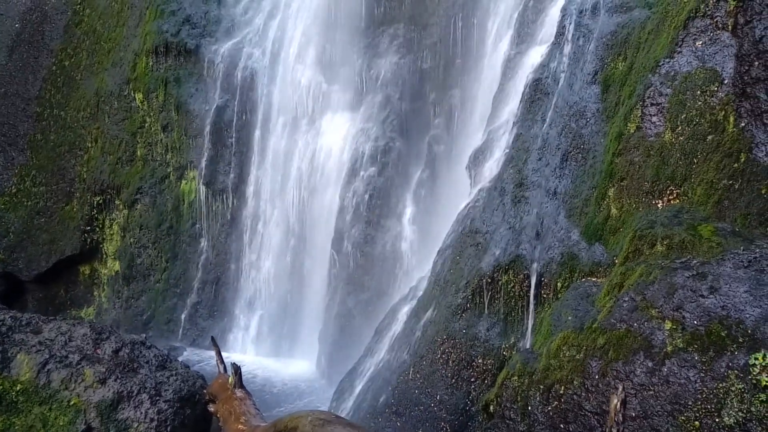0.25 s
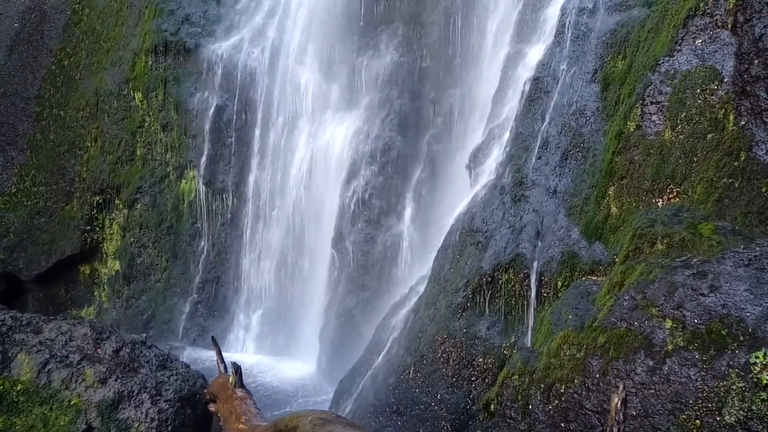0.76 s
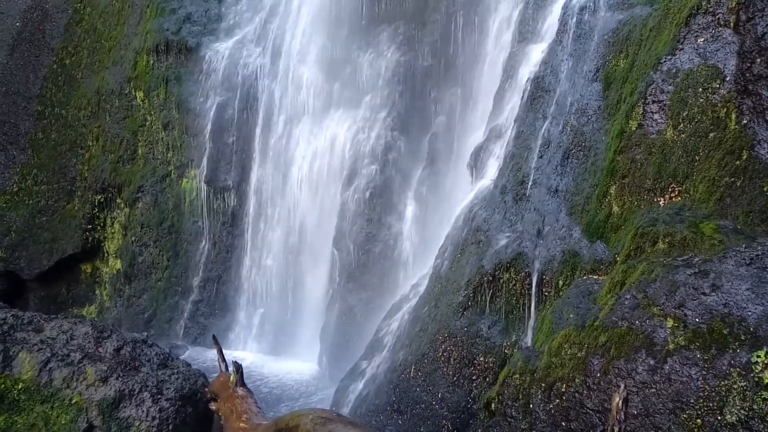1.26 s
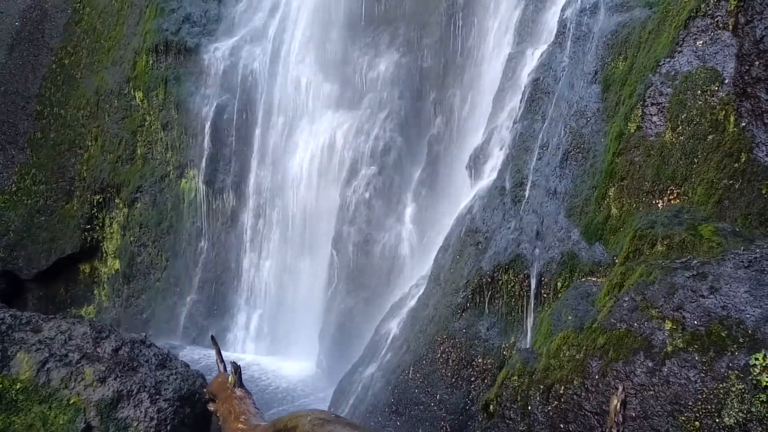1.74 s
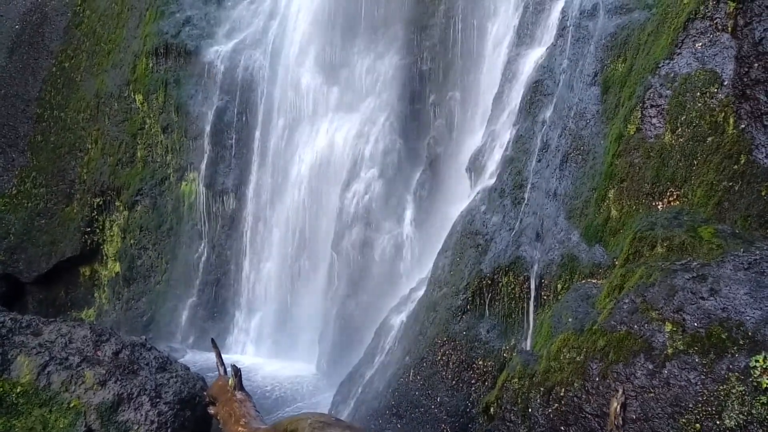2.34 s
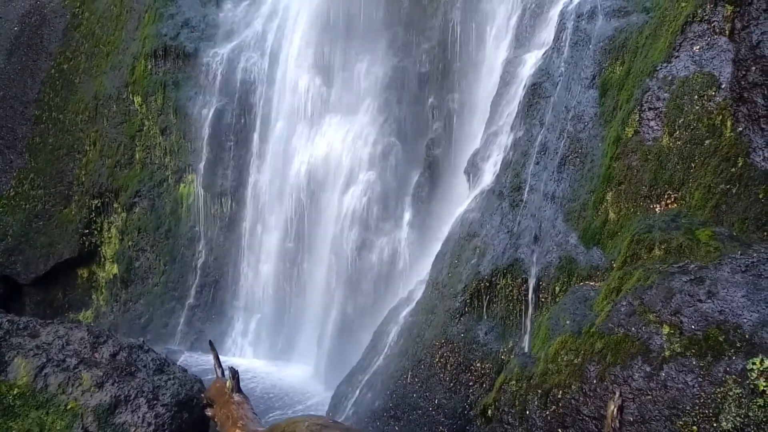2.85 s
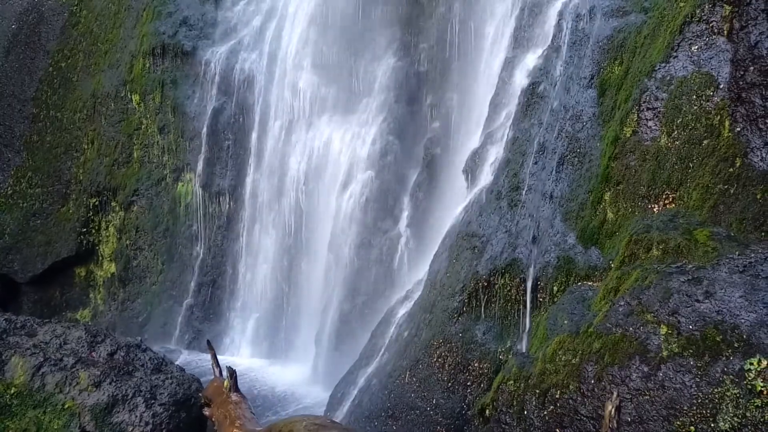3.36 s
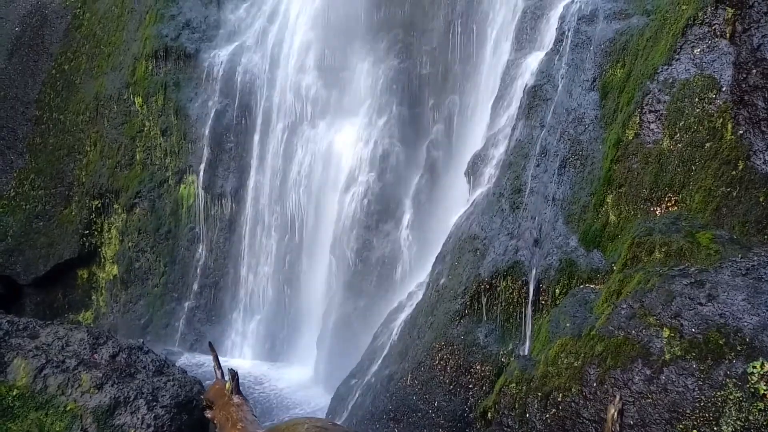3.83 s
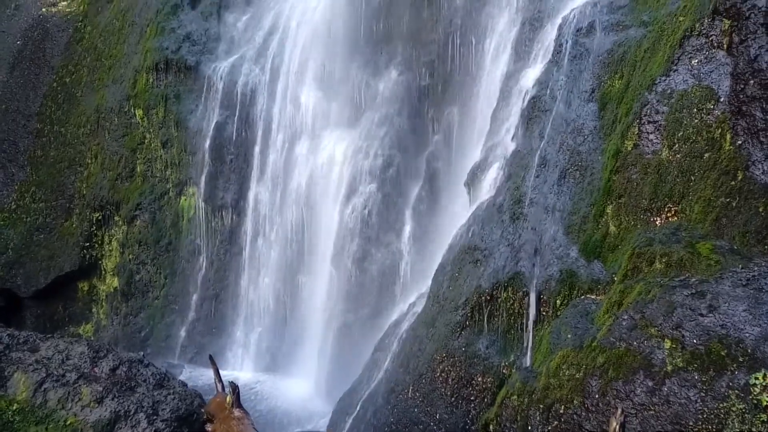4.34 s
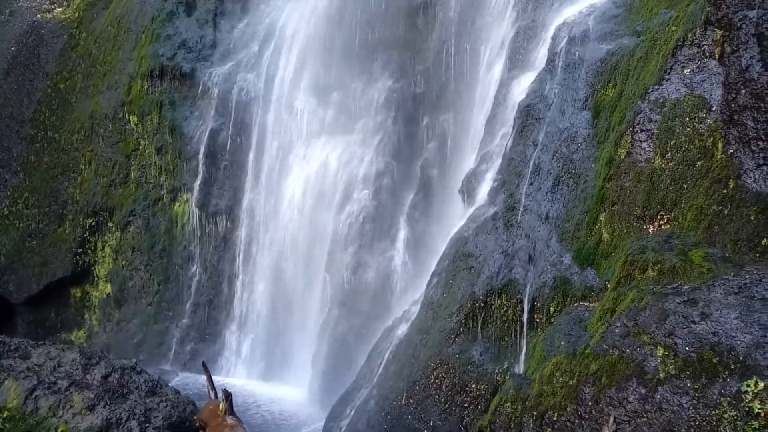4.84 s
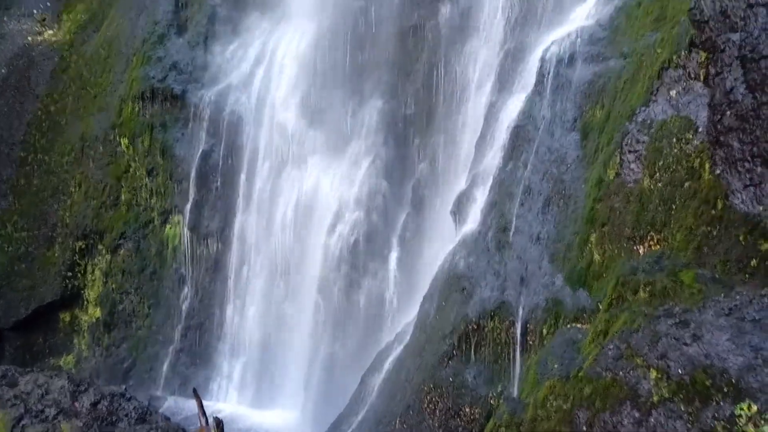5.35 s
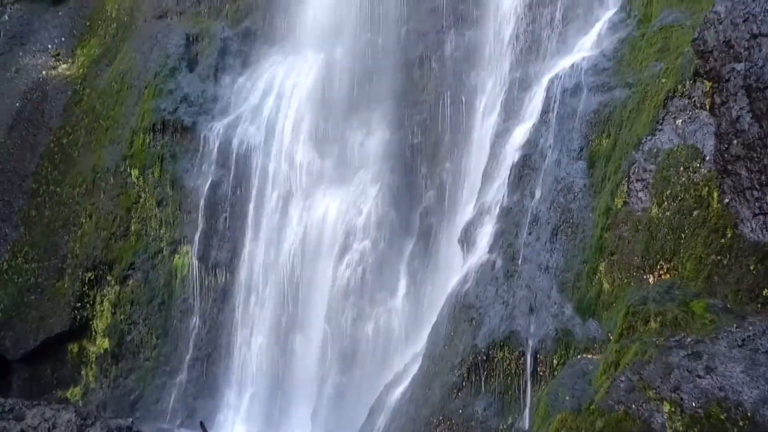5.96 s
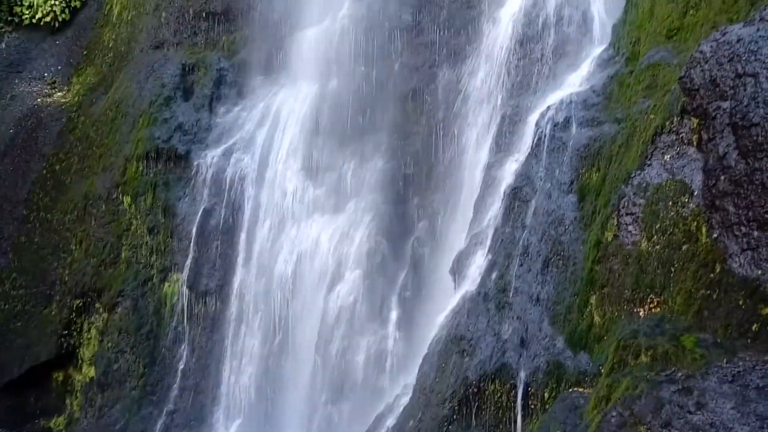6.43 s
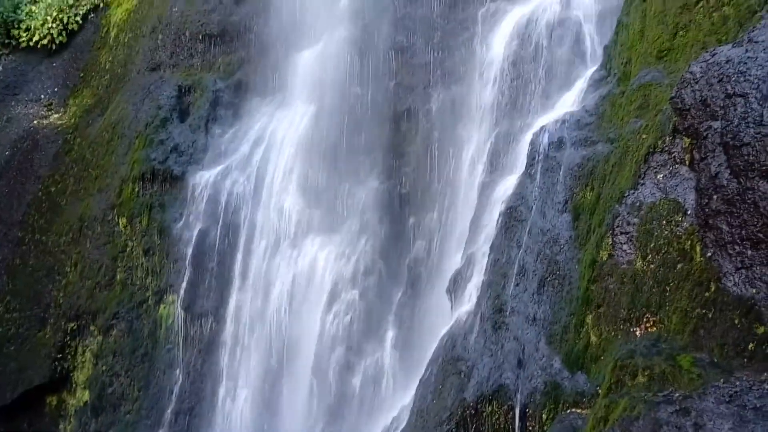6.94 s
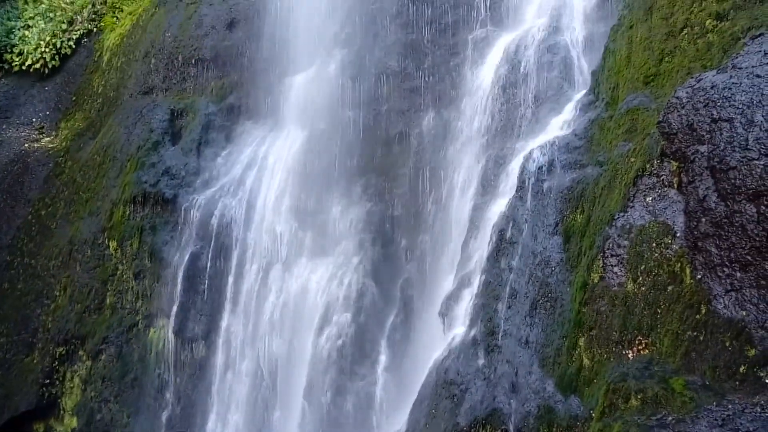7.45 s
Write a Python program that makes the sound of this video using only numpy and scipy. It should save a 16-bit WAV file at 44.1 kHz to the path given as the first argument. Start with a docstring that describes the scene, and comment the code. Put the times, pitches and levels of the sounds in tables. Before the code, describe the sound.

Continuous rushing water from a high fall, already at full strength at the start and never stopping. Fine droplets make a smooth, bright hiss with tiny pattering; water breaking on rock adds a softer bubbling wash, over a weak deep roar. The microphone is in open air with no audible echo, the same sound in both channels. Brief muffled wind bumps come irregularly, and the hiss sharpens gently late on.

```python
"""A tall waterfall plunges onto rock: a steady roar from its foot, a bubbly splash and a loud hiss of droplets.
Roar and splash are shaped noise, the splash with ringing bubbles; the hiss is noise mixed with tiny impacts.
The microphone tilts up towards the falling water: the hiss grows louder, most of all around 5 to 7 kHz.
Puffs of air driven by the fall buffet the microphone with soft low rumbles, over a faint, uneven draught."""
import sys
import numpy as np
from scipy import signal
from scipy.fft import rfft, irfft, next_fast_len
from scipy.io import wavfile
from scipy.ndimage import uniform_filter1d

SR = 44100
rng = np.random.default_rng(int(sys.argv[2]) if len(sys.argv) > 2 else 0)


def inscribe(sig):
    """Save sig as 16-bit PCM at rate SR to the path in sys.argv[1].

    A 1-D sig is mono; a 2-D sig holds one channel per row.
    Samples are clipped to [-1, 1] before scaling.
    """
    pcm = np.round(np.clip(np.atleast_2d(sig).T, -1, 1) * 32767)
    wavfile.write(sys.argv[1], SR, pcm.astype(np.int16))


N = 339129  # length of the scene in samples

# Tone shapes: each row is a point on a curve, and only the differences in level matter.
# rumble of moving air at the microphone: pitch_hz [Hz], level_db [dB per Hz]
RUMBLE_SHAPE = [(15, -21), (38, -22), (51, -4), (75, 3.5), (105, -2.5), (150, -6.5), (220, -20.5),
                (400, -31), (800, -55)]
# small eddies stirred by a hard puff: pitch_hz [Hz], level_db [dB per Hz]
FLUTTER_SHAPE = [(60, -23), (130, -13), (200, 7), (290, -1), (420, -18), (900, -40)]
# fine spray: pitch_hz [Hz], level_db [dB per Hz]
SPRAY_SHAPE = [(1900, -29), (3000, -10.5), (3700, -6), (4200, -2.5), (4650, -0.5), (5300, -3), (6000, -7),
               (6900, -9.5), (7900, -10.5), (9300, -17.5), (10500, -20.5), (12700, -16.5), (15700, -21)]
# water breaking on the rock: pitch_hz [Hz], level_db [dB per Hz]
SPLASH_SHAPE = [(300, -21), (420, -7.5), (490, -1), (670, 0.5), (770, -3.5), (900, -2.5), (1030, -1),
                (1600, -1), (2100, 0.5), (3000, 0.5), (3900, -12.5), (6600, -80)]
# roar of the water landing in the pool: pitch_hz [Hz], level_db [dB per Hz]
ROAR_SHAPE = [(20, -24), (38, -30), (51, -11), (66, -3.5), (100, -7.5), (160, -2), (240, -1.5), (330, -3.5),
              (440, -4.5), (600, -18), (1000, -70)]

# change to the spray's tone at full tilt: pitch_hz [Hz], change_db [dB]
RAISED_TONE = [(3000, 0.2), (4000, -0.5), (4800, 1.5), (5800, 2.5), (6800, 2.5), (8200, -3), (10300, -3),
               (12500, -1.0), (15700, -1)]
# puffs of air on the microphone, before a shared lift in buffets():
# centre_s [s], level_db [dB], spread_s [s, standard deviation of the swell], hardness [0 to 1]
AIR_PUFFS = [(0.097, -32.5, 0.027, 0.1), (0.472, -34, 0.018, 0.3), (0.913, -29, 0.0075, 1),
             (1.06, -32.5, 0.016, 0.3), (1.17, -25, 0.0089, 0.05), (1.682, -33, 0.028, 0.15),
             (2.233, -33, 0.02, 0.2), (3.24, -37, 0.032, 0), (3.53, -36, 0.011, 0.2), (3.683, -33, 0.02, 0),
             (4.061, -27, 0.014, 0.6), (4.105, -24.5, 0.009, 0.4), (5.778, -36.5, 0.02, 0.2),
             (6.397, -35, 0.018, 0), (7.075, -35, 0.014, 0), (7.158, -27, 0.007, 0.2),
             (7.205, -33, 0.015, 0), (7.31, -27.5, 0.014, 0.25), (7.375, -27.5, 0.013, 0.07),
             (7.457, -30, 0.015, 0.1), (7.55, -31, 0.025, 0.06)]

# levels in dB; the spray's is for a level microphone and grows by FACING_DB at full tilt
ROAR_DB, SPLASH_DB, SPRAY_DB, FACING_DB = -39.5, -25, -16, 1.1
# the microphone creeps upwards, with one smooth raise on top (tilt: 0 level, 1 fully raised)
START_TILT, CREEP_PER_S = 0.054, 0.055
RAISE_MIDDLE_S, RAISE_TAKES_S, RAISE_BY = 5.9, 1.6, 0.35

CUTOFF_HZ = 15750
DRIFT_STEP = 40  # samples between the computed points of a slow drift
TIME = np.arange(N) / SR  # seconds


def from_db(db):
    """Turn decibels into a gain."""
    return 10 ** (np.asarray(db) / 20)


def rms_one(x):
    """Scale a sound to an rms (average strength) of 1."""
    return x / np.sqrt(np.mean(x ** 2) + 1e-20)


def colour(x, shape):
    """Set the tone of a sound by pitch and level points, joined evenly in octaves."""
    hz, db = np.transpose(shape)
    size = next_fast_len(N)
    bins_hz = np.maximum(np.arange(size // 2 + 1) * SR / size, 1)
    gain = from_db(np.interp(np.log(bins_hz), np.log(hz), db))
    return irfft(rfft(x, size) * gain, size)[:N]


def coloured_noise(shape):
    """Many tiny random motions together make noise with the given tone."""
    return colour(rng.standard_normal(N), shape)


def drift(rate_hz):
    """Smoothed chance wanders slowly, up to about this rate; rms 1."""
    r = np.exp(-2 * np.pi * rate_hz * DRIFT_STEP / SR)
    chance = rng.standard_normal(N // DRIFT_STEP + 2002)
    # the first points are dropped while the smoothing settles
    slow = signal.lfilter([1], [1, -2 * r, r * r], chance)[2000:]
    return np.interp(np.arange(N) / DRIFT_STEP, np.arange(len(slow)), rms_one(slow))


def impacts(per_s, spread_db):
    """Drops land at random moments, many small and a few large; rms 1."""
    size_db = spread_db * np.minimum(rng.exponential(1, N), 4)
    clicks = from_db(size_db) * rng.choice([-1, 1], N)
    lands = rng.random(N) < per_s / SR
    return rms_one(clicks * lands)


def eddies(shape):
    """Turbulence of even strength: its rms is held near 1 over every 20 ms."""
    swirl = coloured_noise(shape)
    power = np.abs(signal.hilbert(swirl, next_fast_len(N))[:N]) ** 2 / 2
    return swirl / np.sqrt(uniform_filter1d(power, int(0.02 * SR)) + 1e-20)


def draught(level_db, gust_db):
    """A faint, uneven flow of air keeps brushing the microphone."""
    gusts = from_db(gust_db * drift(3.7))
    return from_db(level_db) * rms_one(coloured_noise(RUMBLE_SHAPE) * gusts)


def buffets(rumble_db, flutter_db):
    """Each puff swells and fades; a hard one stirs small, quick eddies on top of the large ones."""
    large = from_db(rumble_db) * eddies(RUMBLE_SHAPE)
    small = from_db(flutter_db) * eddies(FLUTTER_SHAPE)
    out = np.zeros(N)
    for centre_s, level_db, spread_s, hardness in AIR_PUFFS:
        near = np.abs(TIME - centre_s) < 4 * spread_s
        swell = from_db(level_db) * np.exp(-0.5 * ((TIME[near] - centre_s) / spread_s) ** 2)
        out[near] += swell * (large[near] + hardness * small[near])
    return out


def aim():
    """The microphone's tilt over time: a slow creep plus one raise that eases in and out."""
    done = np.clip((TIME - RAISE_MIDDLE_S) / RAISE_TAKES_S + 0.5, 0, 1)
    lift = RAISE_BY * np.sin(np.pi / 2 * done) ** 2
    return np.clip(START_TILT + CREEP_PER_S * TIME + lift, 0, 1)


def spray(tilt, drop_db, surge_db):
    """Near drops patter in a smooth hiss of far ones."""
    patter = from_db(drop_db) * impacts(per_s=12000, spread_db=1.0)
    hiss = colour(rng.standard_normal(N) + patter, SPRAY_SHAPE)
    # the microphone's treble response changes with its angle to the fall
    hiss = (1 - tilt) * hiss + tilt * colour(hiss, RAISED_TONE)
    return rms_one(hiss) * from_db(surge_db * drift(12))


def bubbles(per_s, cycles, count=16):
    """Trapped air rings, each bubble size at its own pitch, fading 60 dB in this many cycles; rms 1."""
    out = np.zeros(N)
    for hz in np.geomspace(450, 3000, count):
        r = from_db(-60 * hz / (cycles * SR))  # fade per sample
        turn = 2 * np.pi * hz / SR
        hits = impacts(per_s / count, spread_db=4.0) + 1e-18
        ringing = signal.lfilter([1, 0, -1], [1, -2 * r * np.cos(turn), r * r], hits)
        out += np.sqrt(hz) * rms_one(ringing)  # higher bubbles are stronger
    return rms_one(out)


def splash(bubble_db, surge_db):
    """Sheets of water break on the rock into a wash with bubbles in it."""
    wash = rms_one(coloured_noise(SPLASH_SHAPE))
    ringing = from_db(bubble_db) * bubbles(per_s=5000, cycles=10.4)
    return rms_one(wash + ringing) * from_db(surge_db * drift(9.8))


def roar():
    """Clouds of air plunge into the pool and boom together, as steady low noise."""
    return rms_one(coloured_noise(ROAR_SHAPE))


def scene():
    """Add moving air at the microphone to the steady fall, the same in both channels."""
    tilt = aim()
    air = draught(level_db=-58, gust_db=8) + buffets(rumble_db=0.5, flutter_db=0.5)
    hiss = from_db(SPRAY_DB + FACING_DB * tilt) * spray(tilt, drop_db=-4.5, surge_db=0.28)
    body = from_db(SPLASH_DB) * splash(bubble_db=-7.5, surge_db=0.22) + from_db(ROAR_DB) * roar()
    return np.tile(air + hiss + body, (2, 1))


def record(dry):
    """Cut the very top of the treble steeply."""
    low_pass = signal.ellip(14, 0.05, 90, CUTOFF_HZ, fs=SR, output="sos")
    return signal.sosfilt(low_pass, dry)


dry = scene()
out = record(dry)
inscribe(out)
```